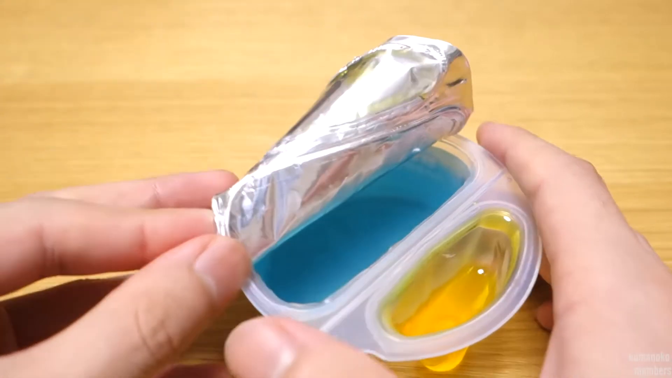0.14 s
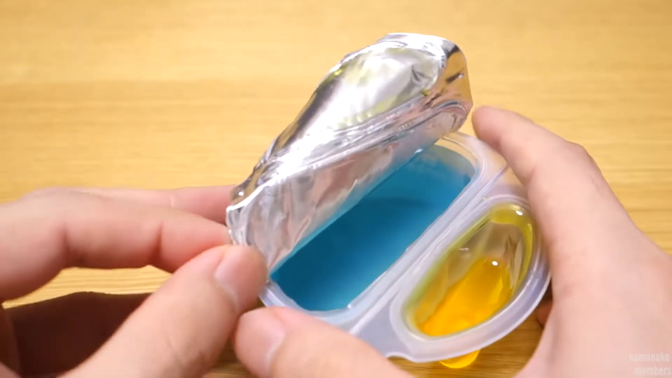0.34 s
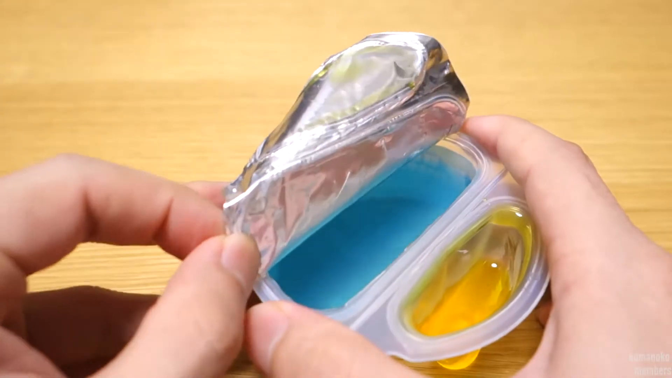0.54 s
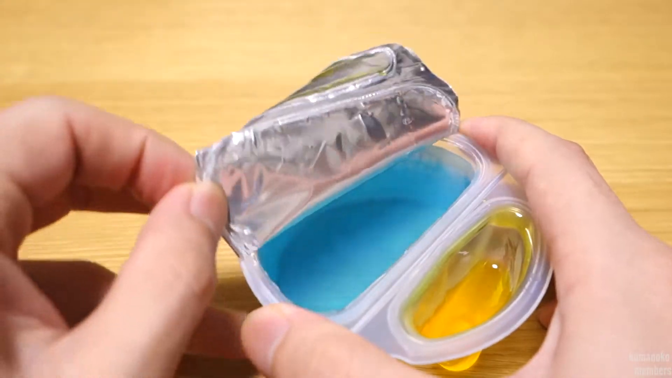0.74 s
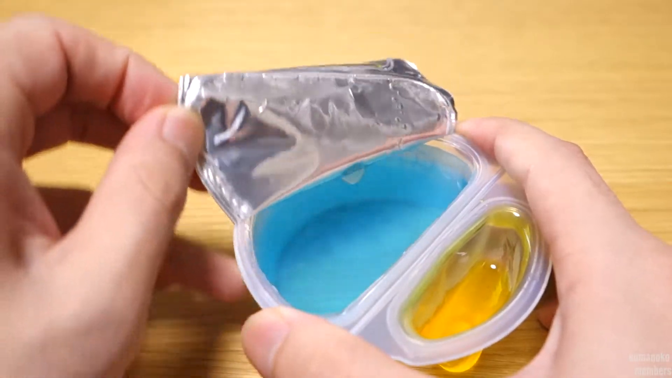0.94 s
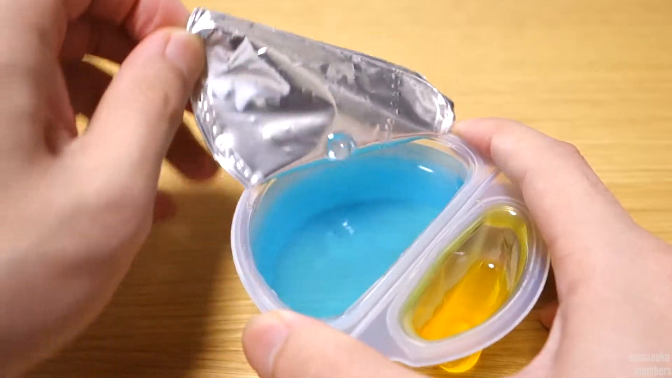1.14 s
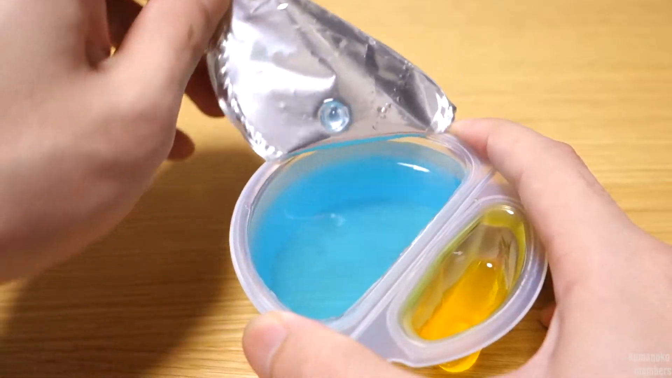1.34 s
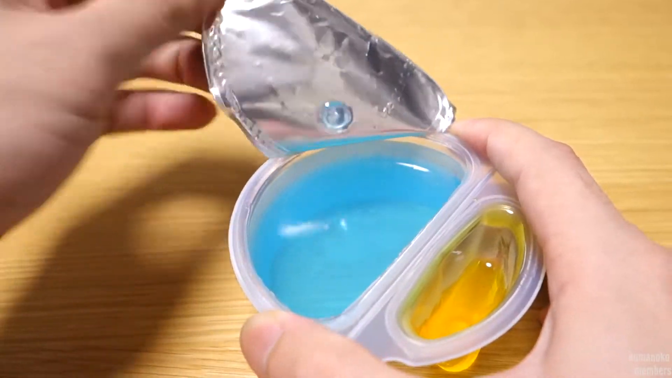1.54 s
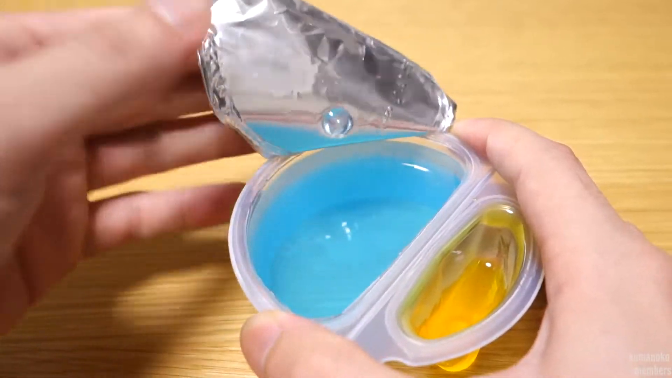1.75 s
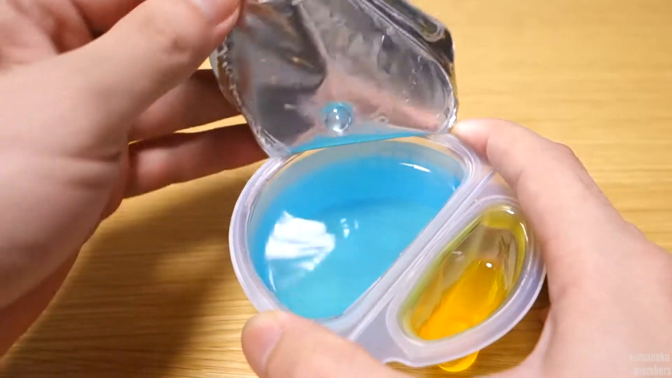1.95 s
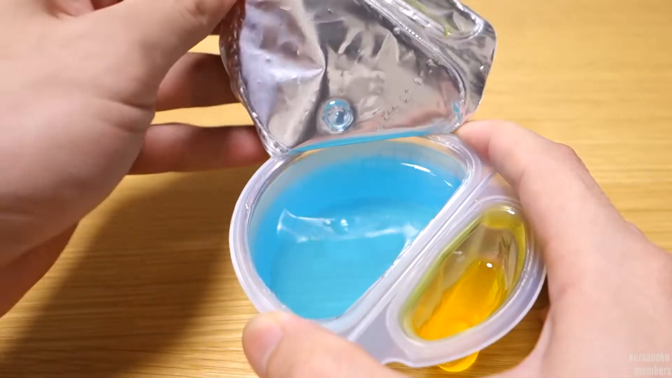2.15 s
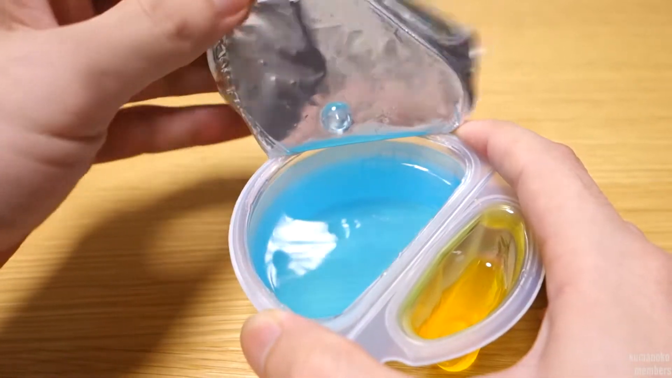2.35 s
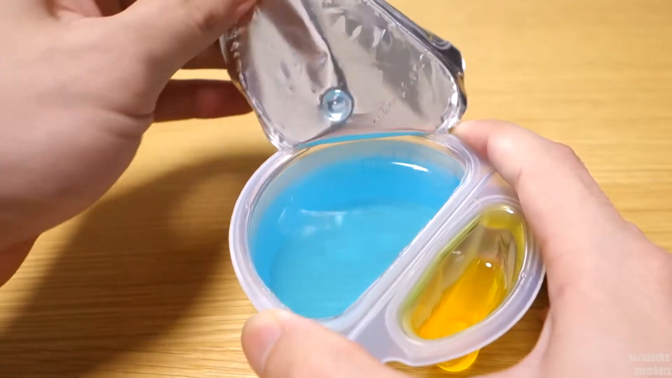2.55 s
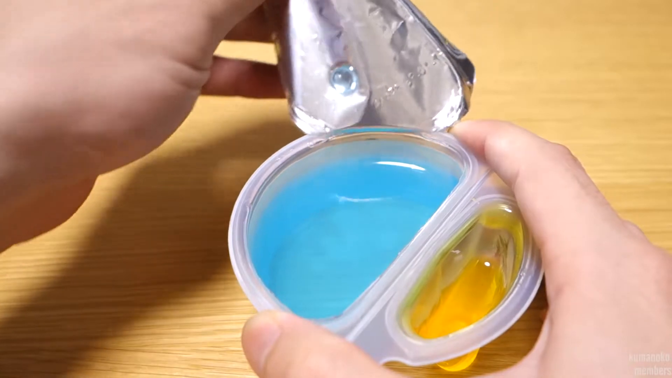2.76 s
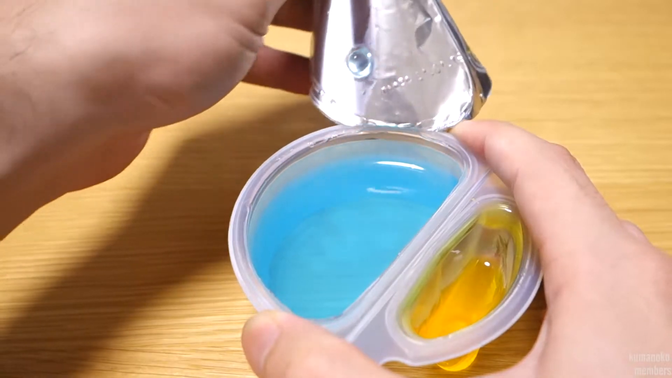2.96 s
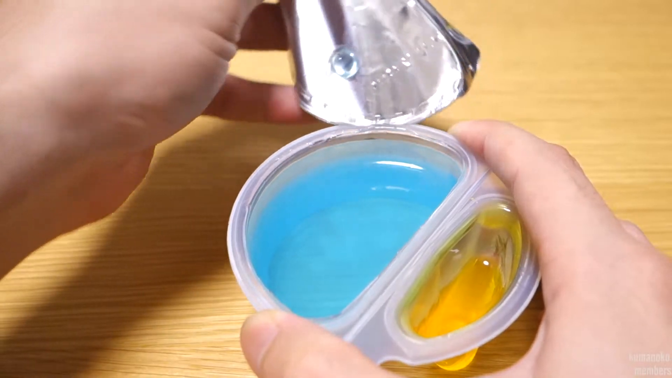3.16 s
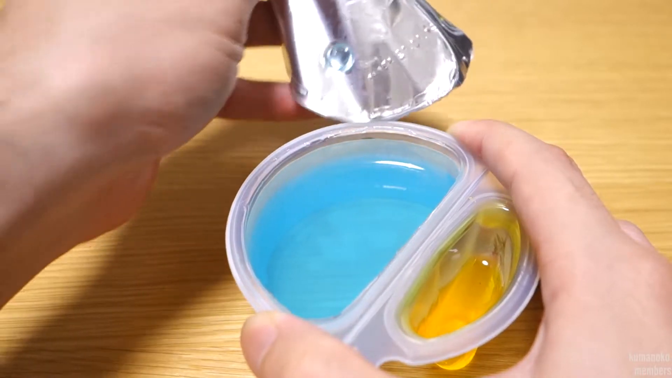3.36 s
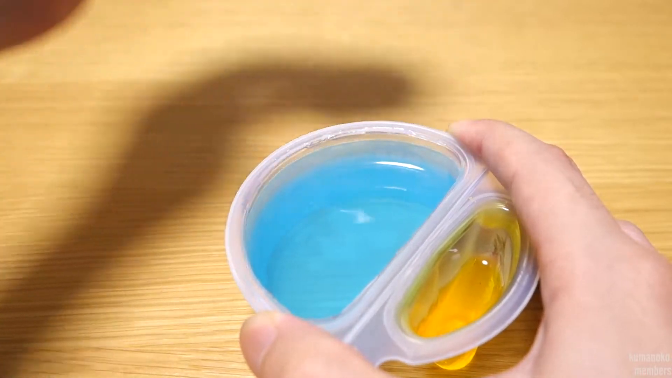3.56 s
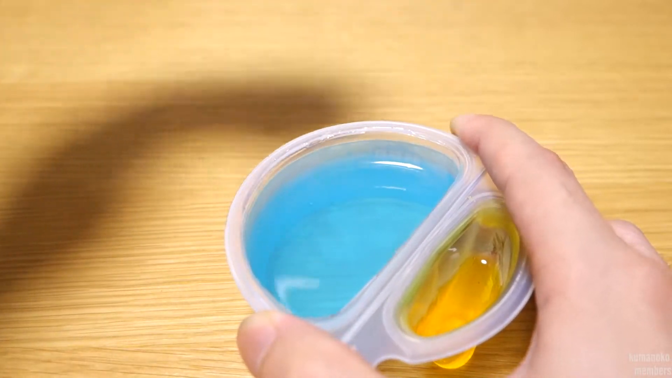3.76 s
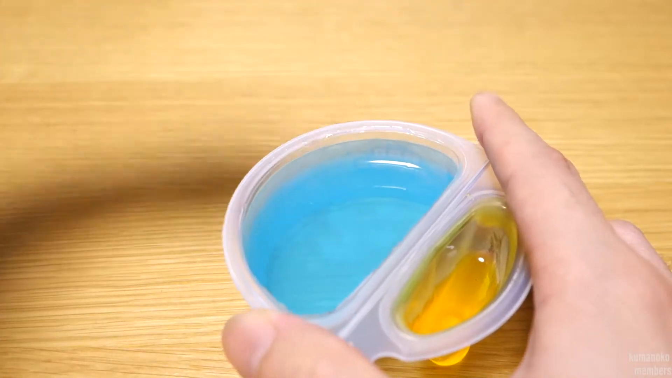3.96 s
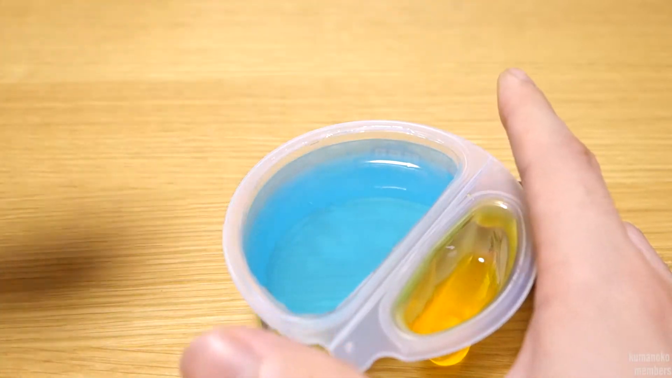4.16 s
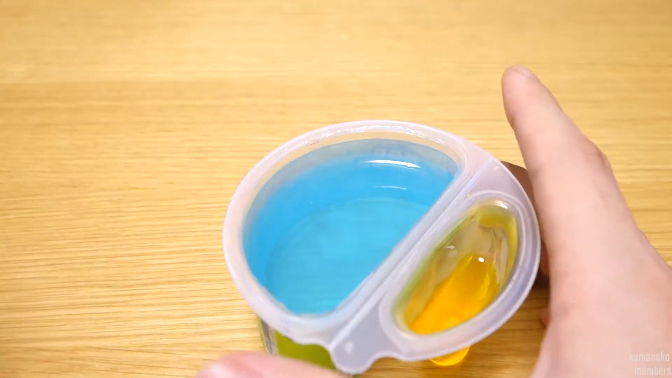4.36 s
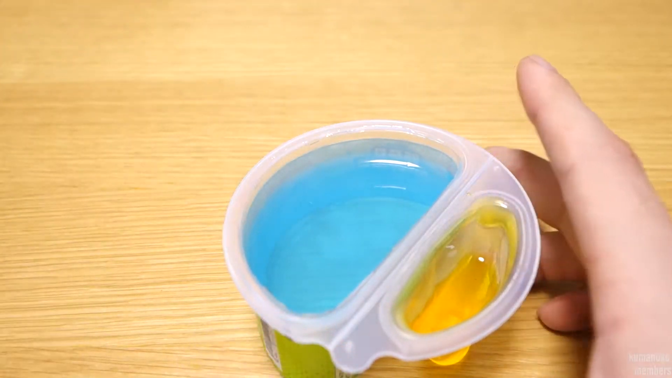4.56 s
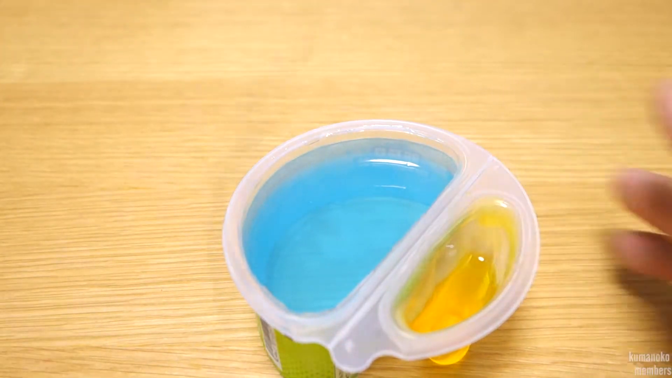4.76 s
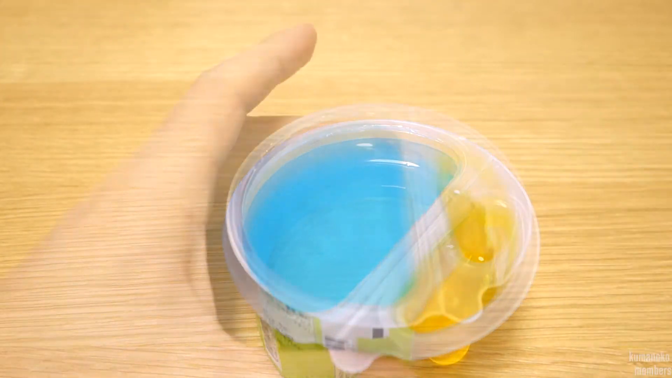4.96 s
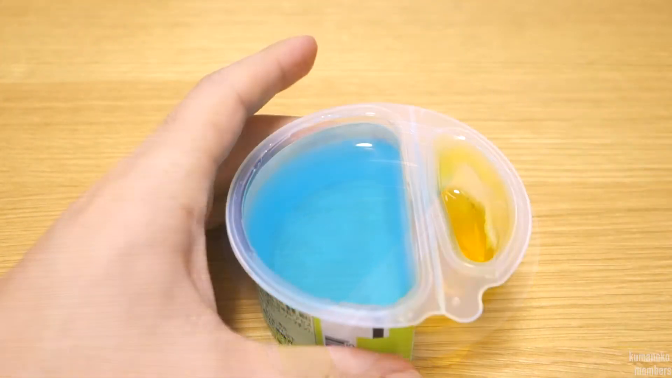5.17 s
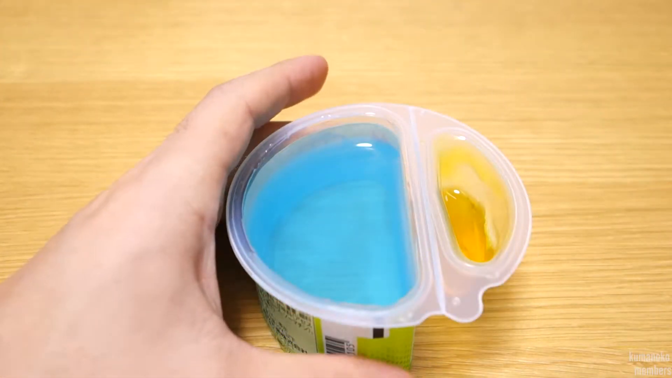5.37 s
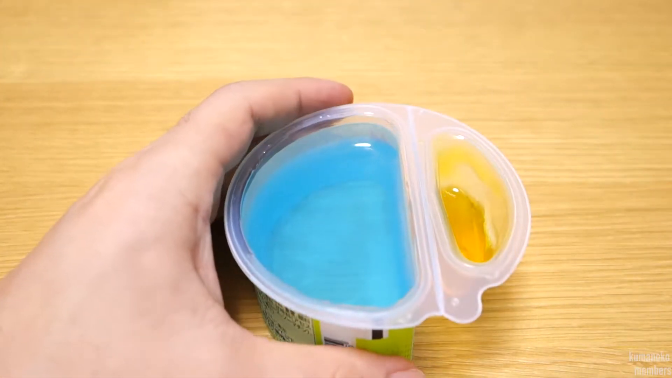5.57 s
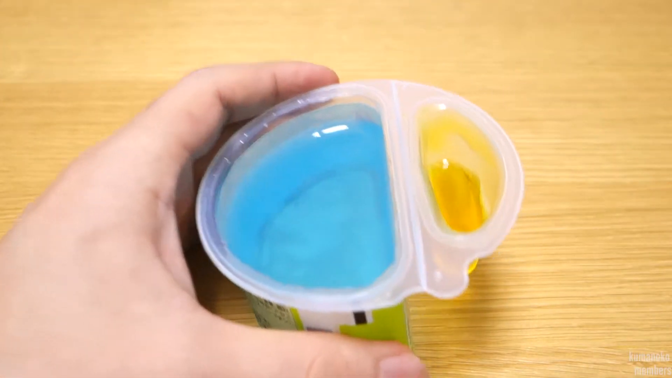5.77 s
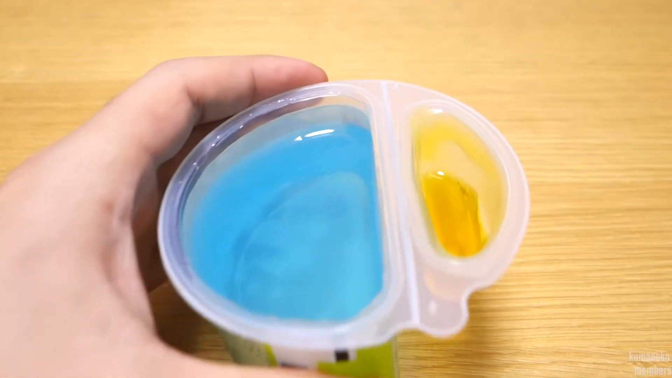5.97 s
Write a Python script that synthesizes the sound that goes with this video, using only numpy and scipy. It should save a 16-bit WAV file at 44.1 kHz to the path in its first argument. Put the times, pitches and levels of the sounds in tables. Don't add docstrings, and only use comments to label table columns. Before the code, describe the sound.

Close stereo in a small room with short reflections and a faint low appliance hum. A crisp foil crack comes at 0.14 s, more at 0.45 and 0.6, then a loud tight cluster of rim pops from 0.65 to 1.0, the plastic cup answering with hollow knocks. Dry ticks follow at 1.1-1.2 and a sharp crack at 1.34. From 1.6 to 2.15 the lid buckles in jerks, with short seam crackles, thin foil ringing and soft table thumps. Folds and knocks continue at 2.3-2.5, a strong crack hits at 2.6, then lighter ticks and faint foil rustle. A pop sounds at 3.1, and a last crackling tear with fine snaps and a table thump runs 3.4-3.77. Small plastic ticks and finger rubs fade by 4.3; soft bumps come near 4.7, 5.03 and 5.65, otherwise quiet hum.

```python
import sys
import numpy as np
from scipy import signal
from scipy.fft import rfft, irfft, next_fast_len
from scipy.io import wavfile
from scipy.ndimage import uniform_filter1d, map_coordinates

SR = 44100
rng = np.random.default_rng(int(sys.argv[2]) if len(sys.argv) > 2 else 0)


def undo_db(level):
    steps = np.asarray(level, float) / 20
    return 10 ** steps


def inscribe(sig):
    pcm = np.round(np.clip(np.atleast_2d(sig).T, -1, 1) * 32767)
    wavfile.write(sys.argv[1], SR, pcm.astype(np.int16))


N = 265036

TICKS = [(1.1132, -10.5, 3240, 2418, -51.5), (1.1783, -15, 2420, 4520, -24), (1.365, -35, 5750, 9300, 4),
         (1.669, -29.5, 5560, 4216, -15), (1.9314, -12, 1630, 3190, -14.5), (1.9473, -9, 3820, 4590, -23),
         (1.9625, -29, 4780, 6680, -11), (2.136, -25, 5400, 3476, -13), (2.4848, -15.5, 1620, 4306, -5.5),
         (2.6786, -24.5, 1620, 9740, -3), (2.6945, -17, 2640, 1670, -28), (2.733, -44, 5190, 2540, -3),
         (2.738, -45, 5080, 1230, 0), (2.8287, -24.5, 1390, 4890, -4.5), (2.895, -36.5, 5030, 6600, 5),
         (3.094, -39, 4750, 1420, -1), (3.328, -27.5, 2130, 1550, -34), (3.4338, -14.5, 5130, 8680, -6.5),
         (3.53, -28, 5190, 3550, -33.0), (3.548, -37, 5250, 8760, 2), (3.561, -24, 4700, 3540, -15),
         (3.653, -25, 2830, 4370, -1.5), (3.741, -20.5, 3500, 5060, -11), (3.936, -43, 4940, 3420, -40),
         (4.277, -36.5, 3530, 12150, -16), (4.32, -43, 3420, 12900, -5.5)]
CRACKS = [(0.083, -44, 1590, 3790, -27), (0.1383, -13.5, 1973, 2580, -8.5),
          (0.4419, -10, 2650, 1740, -13.5), (0.584, -59, 2000, 5680, -10.5),
          (0.592, -13, 2480, 3680, -20.5), (0.597, -18, 1870, 2800, -28.5), (0.668, -22, 1800, 4320, -22.5),
          (1.3374, -10, 1690, 2650, -7), (1.457, -35, 1400, 1920, -36), (1.4647, -15.5, 1150, 2420, -27.5),
          (1.812, -28, 1870, 3400, -15.5), (1.888, -18.5, 1860, 3400, -12.5),
          (1.9012, -22, 1790, 4000, -11.5), (2.308, -52, 2160, 9070, 10), (2.33, -23.5, 2010, 3360, -30),
          (2.6, -7, 1670, 5000, -9.5), (3.576, -21.5, 4940, 2740, -36), (3.622, -26, 5000, 2600, -29),
          (3.67, -30, 2730, 3700, 2), (3.7, -26, 3700, 2750, -3), (3.718, -22.5, 3700, 4950, -9),
          (3.732, -28, 3550, 4970, -12), (3.763, -29, 2330, 3600, -19), (4.054, -36.5, 1900, 2020, -36),
          (4.31, -50, 3640, 5540, -13.5)]
POPS = [(0.646, -28.5, 1944, 2520, -26.0), (0.6856, -3.5, 2640, 3490, -24), (0.7024, -6.5, 2540, 1490, -20),
        (0.784, -20, 1750, 2240, -50.0), (0.836, -15, 1830, 2390, -49.5), (0.8835, -24, 1387, 750, -40.5),
        (0.9299, -17.5, 2550, 1830, -26), (0.963, -9, 3153, 1830, -35), (1.0127, -17.5, 1748, 2450, -28),
        (1.587, -30.5, 1770, 1010, -6), (2.4709, -16, 1414, 2500, -5), (2.617, -20.5, 1726, 1210, -19),
        (3.1161, -15, 2270, 1480, -14.5), (3.428, -32, 1224, 5510, -34)]
FOLDS = [(0.002, -33, 2690, 3940, -21), (0.144, -24.5, 2000, 3620, 0.5), (0.258, -37.5, 1610, 2000, -15),
         (0.742, -18.5, 2500, 1560, -23), (0.821, -34, 2860, 1980, -30.0), (1.261, -23, 1740, 2630, -41),
         (1.499, -28.5, 1810, 1400, -19), (1.611, -28.5, 1440, 4684, -7), (1.6895, -12, 1700, 5060, -5),
         (1.709, -18.5, 1980, 5400, -11.5), (1.884, -28, 1770, 2970, -3), (1.896, -24.5, 1660, 7600, -4),
         (2.121, -22, 1210, 3340, -8.5), (2.317, -16, 1600, 3190, -5.5), (3.088, -50, 1180, 5020, -11),
         (3.099, -30, 1290, 2700, -11)]
KNOCKS = [(0.362, -43.5, 1180, 2170, -24), (0.827, -25.5, 2110, 1270, -44), (1.59, -22, 1920, 970, -9.5),
          (2.071, -28.5, 1590, 450, -15.5), (2.396, -32.5, 2540, 1660, -7),
          (2.408, -34.5, 1300, 1790, -10.5), (2.518, -21.5, 1160, 2540, -9), (5.032, -59, 1310, 2220, -8)]
BUMPS = [(1.554, -44.5, 1080, 1900, -26), (2.102, -47, 1300, 681, -27), (2.176, -48, 1720, 700, -33.5),
         (2.565, -30, 1490, 660, -29), (3.365, -46.5, 1252, 882, -41.5), (4.703, -55.5, 1920, 854, -7.5),
         (5.609, -58.5, 1490, 800, -32)]
TRAILS = [(.154, -29, 1980, 3490, -6), (.697, -21, 2110, 2800, -30), (.714, -21, 2450, 3360, -30)]
# [rows, cup thud/dB, burst t60/s, cup f/Hz, echo/dB]
KINDS = [
    (TICKS, -26, 0.016, 480, -9),
    (CRACKS, -35, 0.027, 420, -5.5),
    (POPS, -18, 0.018, 730, -8),
    (FOLDS, -18.5, 0.056, 500, -7.5),
    (KNOCKS, -8, 0.053, 400, -7),
    (BUMPS, 2.9, 0.041, 540, -11.5),
    (TRAILS, -32, 0.041, 723, -7.5),
]
OVERTONES = [.62, 1.45, 1.95, 2.6]
# [f/Hz, width/Hz, level/dB]
PANEL = [(1230, 43, -0.5), (1490, 22, 4), (2540, 19, 6), (2740, 11, -11), (5150, 31, -19)]
# [f/Hz, level/dB]
SHEEN = [(2500, -24), (4500, -3), (6500, -7.5), (8600, -5), (11500, -12), (16000, -20), (18000, -73.5)]

# [t/s, length/s, first level/dB, last level/dB, tautness/0-1]
TEARS = [(0.129, 0.012, -55, -31.5, 0.1), (1.701, 0.032, -34, -37.5, 0.42),
         (1.733, 0.02, -38.5, -30.5, 0.3), (1.748, 0.067, -35.5, -44, 0.45), (1.905, 0.017, -45.5, -48, .1),
         (2.089, 0.024, -60.5, -36, 0.57), (2.119, 0.021, -18.5, -61, 0.98),
         (3.414, 0.018, -58.5, -56.5, 0.11), (3.432, 0.19, -28.5, -59.5, 0.55),
         (3.651, 0.064, -36.5, -29.5, 0.99), (3.701, 0.024, -35, -33, 0.8), (3.728, 0.022, -29, -33, 1)]
# [t/s, length/s, first level/dB, last level/dB, f/Hz]
CREAKS = [(0.717, 0.083, -29.5, -51, 2600), (1.764, 0.021, -43, -59.5, 1850),
          (1.895, 0.018, -40.5, -56.5, 1850), (2.113, 0.036, -41, -53, 1300),
          (2.605, 0.05, -31, -47.5, 1600), (4.697, 0.042, -59, -73, 1890)]
# [t/s, length/s, first level/dB, last level/dB, f/Hz]
SINGS = [(0.075, .02, -47, -53, 1590), (0.459, 0.078, -37, -60, 3040), (0.691, 0.0092, -26, -26, 2000),
         (0.697, 0.11, -31, -46, 2020), (1.132, 0.026, -46, -50, 3320), (1.344, 0.09, -44, -54, 1740),
         (1.739, 0.015, -35, -33, 3850), (1.742, 0.024, -34, -33.5, 3840), (1.775, 0.023, -35, -42, 3900),
         (1.776, 0.038, -40, -43, 1785), (1.859, 0.018, -41, -50.5, 1810), (2.492, 0.032, -48, -43, 1470),
         (2.618, 0.072, -42, -50, 2870), (3.45, 0.058, -36, -50, 1468), (3.662, 0.028, -42, -43, 2790),
         (3.684, 0.046, -52, -63, 790), (3.896, 0.17, -62.5, -70, 2510), (3.93, 0.064, -69, -61, 1320),
         (4.003, 0.048, -65, -67, 5340), (4.17, .04, -62, -72, 5270), (4.289, 0.033, -73.5, -56, 3316),
         (4.705, 0.028, -66.5, -66, 853), (1.04, 0.18, -58.5, -51, 5960), (1.123, 0.0091, -40, -42, 4070),
         (1.19, 0.095, -61, -71, 9200), (1.738, 0.019, -31, -33.5, 9950), (2.715, 0.32, -52, -62, 1357),
         (2.717, 0.18, -60, -60, 2450), (3.676, 0.038, -37, -43, 8200), (5.79, 0.12, -71.5, -74.5, 3300),
         (5.722, 0.29, -82, -69.5, 2090)]
# [f/Hz, width/Hz, level/dB]
SEAM = [(2183, 62, 2.5), (2764, 26, 3.5), (3620, 51, 6), (4186, 33, 4), (5130, 110, 1.5), (8600, 200, -10),
        (10000, 14, -7)]
RUN_EDGE_S = 0.004
SLACK_TREBLE_DB, TAUT_DULLS_DB = 4, -21

PUSHES = [(0.419, -42, 92), (0.69, -30.5, 309.5), (0.866, -36, 276), (1.133, -56, 265), (1.237, -33, 253),
          (1.601, -38.5, 334), (1.958, -45, 240), (2.132, -37, 190), (2.313, -37.5, 183), (2.41, -34, 147),
          (3.436, -25, 235.2), (4.697, -33.5, 227.7), (5.028, -37, 196.4)]
NUDGES = [(.837, -22.5, 530), (1.339, -34, 463), (2.072, -34, 433), (2.101, -29, 410), (2.123, -47, 310),
          (2.331, -30, 410), (2.405, -49, 255), (2.422, -32, 302), (3.117, -23.5, 458), (3.493, -25.5, 259),
          (5.056, -50, 205), (5.66, -45, 250)]
RAPS = [(.442, -25, 760), (.686, -14.5, 623), (.784, -37, 1150), (.884, -24.5, 683), (.93, -32, 740),
        (.963, -12.5, 723), (1.013, -22, 650), (1.113, -41, 790), (1.465, -44, 1070), (2.317, -21, 678),
        (3.328, -29, 1190)]
PINGS = [(.1384, -9, 2630), (.1386, -11, 3560), (.1445, -12, 2020), (1.1133, -9, 4030),
         (1.1133, -10.5, 4860), (1.1134, -10.5, 2526), (1.1134, -17, 3295), (1.1784, -14, 2200),
         (1.1784, -19.5, 4270), (1.692, -9, 4050), (1.697, -15, 850), (2.6948, -11, 2730),
         (2.6946, -23, 4100), (3.1162, -16.5, 875), (3.1162, -14, 2240), (3.1162, -17, 1140),
         (3.434, -14, 2124), (3.434, -18.5, 8600), (3.365, -27, 850), (.4445, -12, 1850),
         (.4425, -10, 2643), (.598, -7, 1850), (.5925, -17, 2720), (1.3376, -10, 1700),
         (1.3376, -10.5, 3580), (1.3376, -15, 9500), (1.465, -12.5, 1910), (1.9474, -13, 7530),
         (1.9474, -20, 9300), (2.072, -17, 1590), (2.3174, -13, 8300), (2.4852, -28, 8700),
         (2.6002, -8, 1760), (2.6004, -10, 8710), (2.121, -28, 11000)]

# [t/s, effort/dB, thin foil hiss share/0-1]
RUB = [(0, -56.5, 0.34), (.33, -51.5, 0.35), (.52, -59, 0), (.65, -55.5, 0.74), (1.09, -45, 0.34),
       (1.57, -53, 0.4), (1.79, -44.5, 0.72), (2.01, -49, 0.4), (2.14, -62, 0.6), (2.54, -58, 0.4),
       (2.75, -50.5, 0.3), (3.11, -57.5, 0.33), (3.78, -59.5, 0), (3.95, -57.5, 0.26), (4.42, -65, 0.38),
       (5.4, -68.5, 0.19), (5.8, -62, 0.1), (6.01, -63.5, 0.03)]
# [f/Hz, density/dB]
BODY = [(260, -41), (450, -6.5), (668, -6), (1000, -5.5), (1560, 0.5), (2270, -0.5), (2620, -8),
        (3210, -11.5), (4500, -16.5), (5850, -46), (9900, -120)]
# [f/Hz, density/dB]
HISS = [(1470, -37.5), (2500, -8.5), (2910, -5), (3200, -6), (3680, -9), (4170, -8), (9400, -12.5),
        (13000, -18),
        (14300, -50.0), (16000, -93.0)]
TEAR_RUSTLE_DB = -20.5
# [t/s, half length/s, level/dB]
STROKES = [(0.0, 0.026, -50), (4.04, 0.035, -55), (4.18, 0.031, -57), (4.28, 0.011, -53),
           (4.31, 0.032, -51.5), (4.72, 0.077, -64), (4.94, 0.048, -63.5), (5.87, 0.14, -67.5)]
# [f/Hz, density/dB]
SKIN = [(1470, -19), (2500, -3.5), (3460, -4.5), (3920, -8), (5560, -4), (9000, -9.5), (13500, -14.5),
        (15800, -25)]
# [t/s, half length/s, level/dB]
WHISTLES = [(3.32, 0.12, -75), (4.94, 0.09, -70.5), (5.68, 0.22, -75)]
# [f/Hz, density/dB]
WHISTLE_BAND = [(8300, -40), (8900, -3), (10100, -3), (10800, -40)]
# [t/s, half length/s, level/dB]
PRESSES = [(.4, 0.073, -85), (1.22, 0.029, -49.5), (1.6, 0.033, -57.5), (2.13, 0.027, -46),
           (2.41, 0.037, -66), (3.455, 0.025, -41), (4.15, 0.069, -66), (5.02, 0.046, -64.5),
           (5.66, 0.06, -55.5)]
# [f/Hz, density/dB]
WOOD = [(120, -43.0), (170, -11.5), (250, -3.0), (350, -6.0), (500, -40.0)]

# [f/Hz, density/dB]
HUM = [(12, -49), (20, -24.5), (43, -18), (108, -0.5), (135, -3.5), (163, -8.5), (235, -4), (269, -9.5),
       (316, -7), (367, -27), (409, -21.5), (431, -22), (500, -28.5), (650, -64.5), (1100, -120)]
# [f/Hz, density/dB]
AIR = [(240, -45.5), (400, -12.5), (449, -9.5), (541, -13), (599, -1.5), (1200, -14.5), (1710, -11),
       (1870, 5), (2250, -13), (2600, -22), (3180, -41), (3470, -32), (5660, -30.5), (11500, -34),
       (14000, -63.5), (22000, -120)]
# [f/Hz, likeness/-1..1]
ALIKE = [(60, 1.3), (180, 1), (330, 0.98), (550, 0.47), (1650, 0.22), (4970, 0.51), (15000, -0.26)]
# [f/Hz, t60/s]
WALLS = [(250, 0.32), (800, 0.33), (2000, 0.22), (5500, 0.33), (14000, 0.28)]
# [f/Hz, likeness/-1..1]
ECHO_ALIKE = [(300, 1), (1100, .85), (2400, 0.42), (5000, 0.58), (12000, 0.8)]
# [f/Hz, level/dB]
MIC = [(11000, -1), (13500, -2.5), (15000, -6), (16000, -21), (16600, -53)]


def unit(x):
    return x / np.sqrt(np.mean(x ** 2) + 1e-20)


def peak(x):
    return x / np.abs(x).max(axis=-1, keepdims=True)


def along(points, hz):
    f, v = np.transpose(points)
    return np.interp(np.log(hz + 1), np.log(f + 1), v)


def curves(rows):
    s, *cols = np.transpose(rows)
    return [np.interp(np.arange(N) / SR, s, c) for c in cols]


def wobble(rate_hz):
    knots = rng.standard_normal(int(N * rate_hz / SR) + 4)
    return map_coordinates(knots, [np.arange(N) * rate_hz / SR])


def filtered(x, response):
    n = x.shape[-1]
    m = next_fast_len(n + 2048)
    return irfft(rfft(x, m) * response(np.fft.rfftfreq(m, 1 / SR)), m)[..., :n]


def resonance(f, hz, width_hz):
    return 1j * f * width_hz / (hz * hz - f * f + 1j * f * width_hz)


def modes(table, widen):
    return lambda f: sum((-1) ** k * undo_db(db) * resonance(f, hz, width_hz * widen)
                         for k, (hz, width_hz, db) in enumerate(table))


def spread(pair, alike, hz):
    turn = np.arccos(np.clip(along(alike, hz), -1, 1))[:, None] / 2
    mid, side = pair[0] * np.cos(turn), pair[1] * np.sin(turn)
    return np.array([mid + side, mid - side])


def rush(spectrum, patchy_db):
    hz, _, z = signal.stft(rng.standard_normal((2, N + 512)), SR, nperseg=512)
    field = uniform_filter1d(rng.standard_normal(z.shape[1:]), size=6, axis=0)
    field = uniform_filter1d(field, size=10, axis=1)
    patches = undo_db(patchy_db * unit(field))
    pair = signal.istft(spread(z, ALIKE, hz) * patches, nperseg=512)[1][:, :N]
    return unit(filtered(pair, lambda f: undo_db(along(spectrum, f))))


def crackle(rate_hz, spiky_db, response):
    sizes = undo_db(spiky_db * np.minimum(rng.exponential(size=N), 2.5))
    slips = (rng.random(N) < rate_hz / SR) * rng.uniform(-1, 1, N) * sizes
    clumps = undo_db(2 * wobble(160))
    return unit(filtered((unit(slips) + 0.3 * rng.standard_normal(N)) * clumps, response))


def run(s, length_s, first_db, last_db):
    t = np.arange(N) / SR - s
    edges = np.clip(t / RUN_EDGE_S, 0, 1) * np.clip(1 - (t - length_s) / RUN_EDGE_S, 0, 1)
    return edges * undo_db(np.interp(t, [0, length_s], [first_db, last_db]))


def swells(rows, order):
    t = np.arange(N) / SR
    return sum(undo_db(db) * np.exp(-np.abs((t - s) / half_s) ** order) for s, half_s, db in rows)


def tails(count):
    noise = rng.standard_normal((2, count, 10000), dtype=np.float32)
    hz, t, z = signal.stft(noise, SR, nperseg=256)
    decay = undo_db(-60 * t / along(WALLS, hz)[:, None])
    tail = signal.istft(spread(z * decay, ECHO_ALIKE, hz), nperseg=256)[1]
    t = np.arange(tail.shape[-1]) / SR
    far_wall = 1 + .5 * np.exp(-((t - .017) / 0.0023) ** 2)
    tail = tail * np.clip((t - .003) / 0.0045, 0, 1) * far_wall
    return tail / np.sqrt(np.mean(np.sum(tail ** 2, axis=-1)))


def crease_panel(hz, second_hz, treble_db, detune):
    top_hz = hz * (2.3 + 9 * undo_db(treble_db))
    over_hz = hz * np.array(OVERTONES) * np.exp(0.043 * detune)

    def response(f):
        overtones = sum((-1) ** k * resonance(f, over_hz[:, [k]], 0.031 * over_hz[:, [k]])
                        for k in range(len(OVERTONES)))
        small = (1j * f / (0.41 * hz + 1j * f)) ** 2 / (1 + 1j * f / top_hz) ** 4
        main = resonance(f, hz, 1.2 * hz) + undo_db(8.5) * resonance(f, hz, 0.095 * hz)
        main = main + undo_db(-3.5 + 0.35 * treble_db) * overtones
        main = main + undo_db(-2.5) * modes(PANEL, widen=3)(f)
        second = resonance(f, second_hz, 0.065 * second_hz) * resonance(f, second_hz, 0.7 * second_hz)
        return main * small - undo_db(5.5) * second
    return response


def snaps():
    rows = [(*row, *shared) for kind, *shared in KINDS for row in kind]
    columns = np.transpose(rows)[:, :, None]
    s, db, hz, second_hz, treble_db, thud_db, t60_s, cup_hz, echo_db = columns
    t, t60_s = np.arange(3072) / SR, np.clip(t60_s, .004, .15)
    noise = rng.standard_normal((len(s), 4, len(t)))

    def burst(k, life_s):
        plateau_and_fade = 0.47 * undo_db(-60 * t / life_s) + np.exp(-(t / (0.11 * life_s)) ** 2)
        return noise[:, k] * (1 - np.exp(-t / (0.015 * life_s))) * plateau_and_fade

    kick = burst(0, t60_s)
    kick[:, 8] += 0.5 * np.linalg.norm(kick, axis=1)
    ring = peak(filtered(kick, crease_panel(hz, second_hz, treble_db, noise[:, 1, :len(OVERTONES)])))
    spit_mid, spit_side = [peak(filtered(burst(k, 0.46 * t60_s), lambda f: undo_db(along(SHEEN, f))))
                           for k in (1, 2)]
    cup_hz = cup_hz * np.exp(0.062 * noise[:, 0, :1])
    thud = peak(filtered(burst(3, t60_s), lambda f: resonance(f, cup_hz, 340) * resonance(f, 600, 1600)))
    hits = undo_db(db) * (ring + undo_db(treble_db + 6.0) * spit_mid + undo_db(thud_db + 4.0) * thud)

    tail = tails(count=len(s))
    m = tail.shape[-1] + 512
    colour = np.sqrt(uniform_filter1d(np.abs(rfft(hits, m)) ** 2, size=130))
    dulled = 1 + (np.fft.rfftfreq(m, 1 / SR) / 12000) ** 2
    wet = irfft(rfft(tail, m) * colour / dulled, m) * undo_db(echo_db)
    wet[..., :len(t)] += hits + undo_db(db + treble_db + 1) * spit_side * [[[1]], [[-1]]]

    out = np.zeros((2, N + SR))
    for k, start in enumerate(np.round(s[:, 0] * SR).astype(int)):
        out[:, start:start + wet.shape[2]] += wet[:, k]
    return out[:, :N]


def tears():
    ringing = crackle(3200, 4.6, lambda f: modes(SEAM, widen=2.5)(f) / (1 + (1900 / (f + 1)) ** 6))
    slack = crackle(2300, 2.1, lambda f: resonance(f, 2200, 3900) ** 2)
    high = np.array([crackle(3500, 8.3, lambda f: undo_db(along(SHEEN, f)) * (f > 5500)) for _ in "LR"])
    out = np.zeros((2, N))
    for *shape, taut in TEARS:
        taut = np.clip(taut, 0, 1)
        treble = undo_db(SLACK_TREBLE_DB + TAUT_DULLS_DB * taut ** 2) * high
        out += run(*shape) * (np.sqrt(taut) * ringing + np.sqrt(1 - taut) * slack + treble)
    return out


def creaks():
    def panel(f):
        body = modes(PANEL, widen=4)(f) + 0.2 * resonance(f, 1300, 900)
        return body / (1 + 1j * f / 4500) ** 3

    slips = crackle(1000, 3.2, panel)
    return sum(run(*shape) * unit(filtered(slips, lambda f: 1 + 0.71 * resonance(f, hz, 0.078 * hz)))
               for *shape, hz in CREAKS)


def sings():
    slips = crackle(2700, 6.1, lambda f: f > 600)

    def pair(hz):
        over_hz, width_hz = 1.31 * hz, .075 * hz
        return lambda f: resonance(f, hz, width_hz) ** 2 + undo_db(-4) * resonance(f, over_hz, width_hz) ** 2

    return sum(run(*shape) * unit(filtered(slips, pair(hz))) for *shape, hz in SINGS)


def peeling():
    out = tears() + creaks() + sings()
    echo = signal.fftconvolve(out.mean(axis=0)[None], tails(count=1)[:, 0], axes=1)[:, :N]
    return out + undo_db(-14.5) * echo


def thumps(rows, t60_s, rise_s):
    out, t = np.zeros(N + SR), np.arange(SR // 4) / SR
    for s, db, hz in rows:
        envelope = undo_db(db - 5.5 - 60 * t / t60_s) * (1 - np.exp(-t / rise_s))
        out[round(s * SR):][:len(t)] += envelope * np.sin(2 * np.pi * hz * t)
    return out[:N]


def foil_rustle():
    effort_db, thin = curves(RUB)
    thin, grain = np.clip(thin, 0, 1), wobble(35)
    torn = undo_db(TEAR_RUSTLE_DB) * sum(run(*row[:4]) for row in TEARS)
    body_gain = (undo_db(effort_db) * np.sqrt(1 - thin) + 0.33 * torn) * undo_db(1.5 * grain)
    hiss_gain = (undo_db(effort_db) * np.sqrt(thin) + 0.55 * torn) * undo_db(1.2 * grain) * undo_db(1.5 * wobble(140))
    return body_gain * rush(BODY, patchy_db=0.9) + hiss_gain * rush(HISS, patchy_db=2.0)


def finger_strokes():
    return swells(STROKES, order=2) * undo_db(1.7 * wobble(70)) * rush(SKIN, patchy_db=-2.0)


def air_whistle():
    return swells(WHISTLES, order=4) * rush(WHISTLE_BAND, patchy_db=.7)


def table_rumble():
    effort_db, _ = curves(RUB)
    weight = undo_db(-56.5 + 0.5 * (effort_db + 50.5)) + swells(PRESSES, order=2)
    return weight * undo_db(1.4 * wobble(17)) * rush(WOOD, patchy_db=2.5)


def room():
    return undo_db(-54) * rush(HUM, patchy_db=1.86) + undo_db(-67.5) * rush(AIR, patchy_db=-0.5)


def scene():
    lid = (snaps() + peeling()) * undo_db([[-.5], [.5]])
    table = thumps(PUSHES, t60_s=0.2, rise_s=0.0047) + thumps(NUDGES, t60_s=.06, rise_s=.002)
    cup = thumps(RAPS, t60_s=.03, rise_s=.0006)
    rim = thumps(PINGS, t60_s=.017, rise_s=.0003) * undo_db([[-1], [1]])
    around = foil_rustle() + finger_strokes() + air_whistle() + table_rumble() + room()
    around = around * undo_db([[-.3], [.3]])
    around[1] = np.roll(around[1], 2)
    return lid + table + cup + rim + around


def band_limit(x):
    return signal.sosfilt(signal.butter(12, 16650, fs=SR, output="sos"), x)


def record(dry):
    x = filtered(dry, lambda f: undo_db(along(MIC, f)))
    mix = x / (1 + np.abs(x / .62) ** 4) ** (1 / 4)
    return band_limit(mix)


dry = scene()
out = record(dry)
inscribe(out)
```